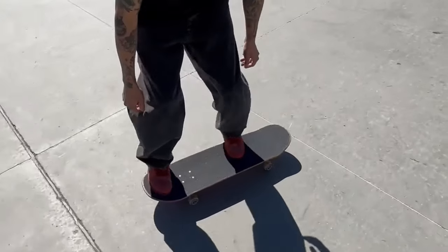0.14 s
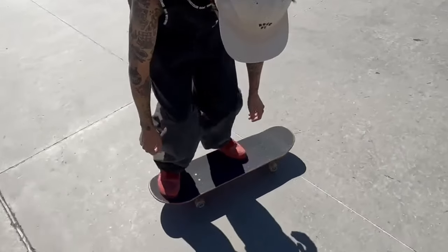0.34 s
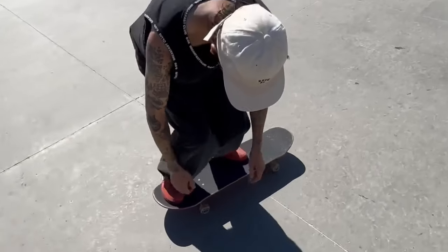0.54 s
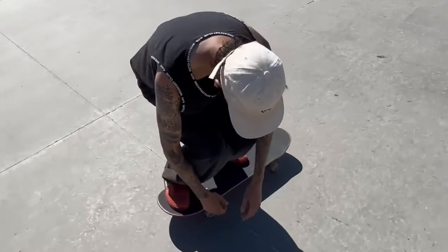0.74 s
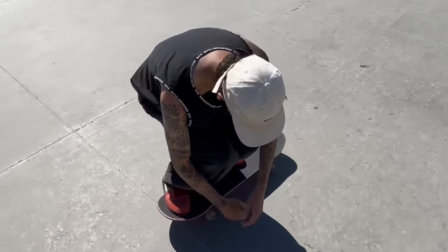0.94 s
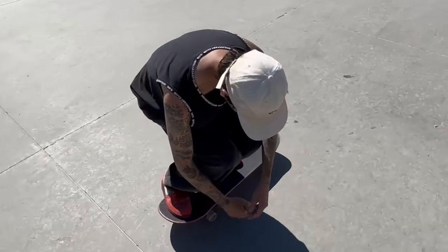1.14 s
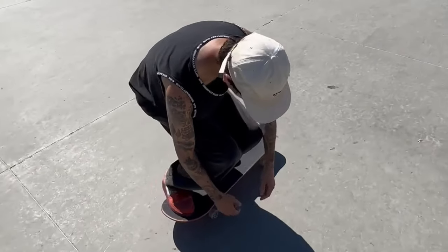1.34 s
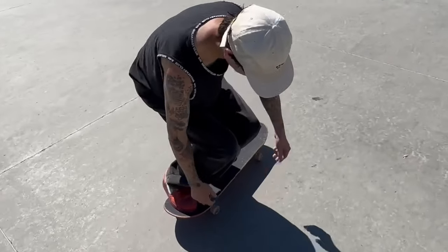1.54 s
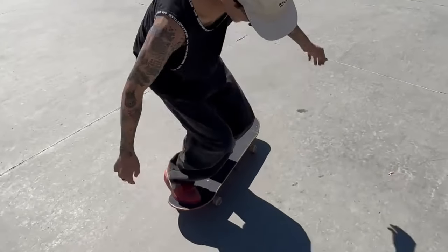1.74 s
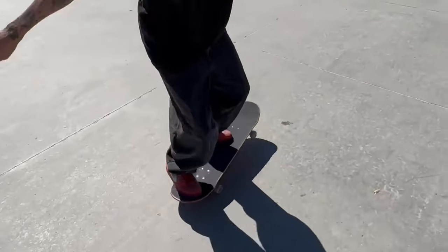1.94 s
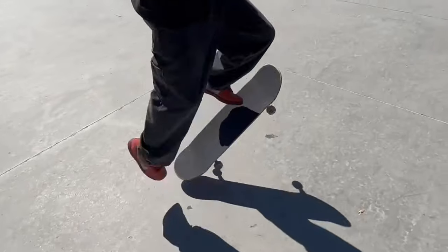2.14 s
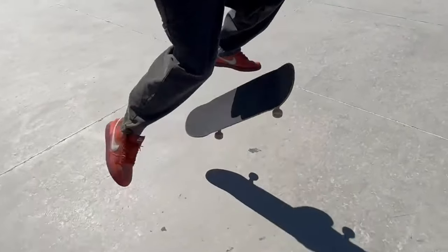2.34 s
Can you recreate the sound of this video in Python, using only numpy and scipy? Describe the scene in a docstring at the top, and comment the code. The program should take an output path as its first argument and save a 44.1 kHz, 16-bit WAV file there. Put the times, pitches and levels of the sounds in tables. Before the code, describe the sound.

Close stereo microphones catch skateboard wheels rumbling on smooth concrete, double knocks at two joints, light shoe scuffs, then a bright woody tail pop, gritty shoe slide and loose truck ticks, with faint open-air scatter.

```python
"""A skateboard knocks over slab joints as it rolls on smooth concrete in an open skatepark, heard close.
Each joint knock rings modes of the weighted deck and its metal trucks, with a burst of gritty noise.
The tail then cracks on the ground: free deck modes ring under a noise crack, and the trucks tick.
Coloured noise makes the wheels' rumble, shoe scuffs on grip tape, the airborne whirr and a puff of wind.
The knocks, tail crack and ticks scatter faintly from the ramps around."""
import sys
import numpy as np
from scipy import signal
from scipy.fft import rfft, irfft
from scipy.io import wavfile
from scipy.ndimage import uniform_filter1d

SR = 44100
rng = np.random.default_rng(int(sys.argv[2]) if len(sys.argv) > 2 else 0)


def log_audio(samples):
    """Write samples as a 16-bit WAV file to the path given in sys.argv[1]."""
    # one column per channel
    frames = np.atleast_2d(samples).T
    # limit to full scale, then quantise
    limited = np.clip(frames, -1, 1)
    pcm = np.round(limited * 32767).astype(np.int16)
    wavfile.write(sys.argv[1], SR, pcm)


N = 105840
T = np.arange(N) / SR
FREQS = np.fft.rfftfreq(2 * N, 1 / SR)

# Ringing of the metal trucks: (frequency at pitch ratio 1 [Hz], relative level [dB], t60 [s])
TRUCK_MODES = [(1740, -6, 0.027), (2505, -8, 0.04), (2675, -3, 0.048), (2900, -5, 0.039),
               (3610, -8.5, 0.059), (4920, 1, 0.014)]
TRUCK_CONTACT_HZ = 6000
# The tail striking the ground: (time [s], relative body level [dB], contact brightness [Hz],
# relative crack level [dB])
TAIL_BLOWS = [(2.0475, 0, 3000, -0.5), (2.0525, -7, 2790, -4), (2.0605, -8.5, 904, -26)]


def undb(db):
    """Turn decibels into gain."""
    return 10 ** (np.asarray(db) / 20)


def over_freq(points):
    """Join (frequency [Hz], value) points on a log-frequency axis."""
    hz, value = np.array(points, float).T
    return np.interp(np.log(FREQS + 1), np.log(hz), value)


def shape(x, gain):
    """Filter by a gain for each frequency, padded to twice the length."""
    return irfft(rfft(x, 2 * N) * gain)[..., :N]


def noise(spectrum, likeness=0):
    """Stereo noise of rms 1 with a given colour; likeness weighs its mid against its side."""
    likeness = np.clip(likeness, -.99, .99)
    colour = undb(over_freq(spectrum))
    mid = shape(rng.standard_normal(N), colour * np.sqrt(1 + likeness))
    side = shape(rng.standard_normal(N), colour * np.sqrt(1 - likeness))
    stereo = np.array([mid + side, mid - side])
    return stereo / stereo.std()


def fader(curve):
    """Gain along (time [s], level [dB]) points, held flat beyond the ends."""
    return undb(np.interp(T, *np.array(curve).T))


def walk(rate):
    """Random steps at the given rate [Hz], smoothed into ramps."""
    step = max(int(SR / rate), 2)
    held = np.repeat(rng.standard_normal(N // step + 1), step)
    return 0.83 * uniform_filter1d(held, step)[:N]


def decay(start, t60, rise):
    """A squared rise, then an exponential fall of 60 dB per t60."""
    age = np.maximum(T - start, 0)
    attack = np.minimum(age / rise, 1) ** 2
    return attack * np.exp(-np.log(1000) * np.maximum(age - rise, 0) / t60)


def swells(rows):
    """A half-sine rise and fall for each (start [s], length [s], peak level [dB]) row."""
    return sum(undb(db) * np.sin(np.pi * np.clip((T - start) / length, 0, 1))
               for start, length, db in rows)


def strike(modes, start, contact_hz, pitch=1):
    """One blow rings a set of decaying modes; a softer contact dulls the high ones."""
    t = T[:SR // 8]
    ring = 0
    for k, (hz, db, t60) in enumerate(modes):
        # neighbouring modes start in opposite directions
        swing = (-1) ** k * np.sin(2 * np.pi * hz * pitch * t)
        ring = ring + undb(db) * swing * np.exp(-np.log(1000) * t / t60)
    contact = signal.butter(2, min(contact_hz, SR / 3), fs=SR, output="sos")
    return np.pad(signal.sosfilt(contact, ring), (int(start * SR), N))[:N]


def at_ports(x):
    """A near sound reaches the two microphones out of step by a phase that varies with frequency."""
    # Phase between the microphones: (frequency [Hz], lead of the left [rad])
    port_phase = [(100, 0.5), (600, 0.4), (900, 1.75), (1300, 0.78), (1900, 1.27), (2900, 1.5), (4400, 4.5)]
    half_each = np.array([[1], [-1]]) / 2
    return shape(x, np.exp(1j * over_freq(port_phase) * half_each))


def wind():
    """A puff of wind on the microphones is low noise that swells and fades."""
    # When the wind puffs: (start [s], length [s], peak level [dB])
    gusts = [(.95, 0.33, -35)]
    # Colour of the wind: (frequency [Hz], relative level [dB])
    wind_colour = [(20, 0.5), (42, -4), (80, -7), (160, -40), (600, -81)]
    return noise(wind_colour) * swells(gusts)


def park(hits):
    """Faint scatter from the ramps around is the hits smeared by a decaying noise tail."""
    scatter_db, t60_s = -22.5, 0.78
    tail = rng.standard_normal((2, N)) * decay(0.017, t60_s, 0.018)
    tail = tail / np.sqrt(np.sum(tail ** 2) / 2)  # mean energy of 1 per channel
    return undb(scatter_db) * shape(hits, rfft(tail, 2 * N))


def shoes_and_bearings():
    """Shoes scuff the grip tape; after the pop a shoe slides up it and the freed wheels whirr."""
    # Shoes on grip tape: (start [s], length [s], peak level before grain [dB])
    scuffs = [(-.02, 0.076, -46.5), (.12, 0.15, -47), (.713, 0.012, -48), (1.569, 0.0083, -44),
              (1.585, .04, -54), (1.732, 0.016, -47), (1.768, 0.016, -54.5), (1.892, 0.021, -33),
              (1.915, 0.044, -58), (2.005, 0.1, -40.5), (2.087, .008, -40), (2.107, .006, -34.5),
              (2.268, .005, -54)]
    # Colour of the scuffs: (frequency [Hz], relative level [dB])
    scuff_colour = [(300, -7.5), (1300, 9), (2200, -1.5), (3200, 1.5), (4300, 3), (5800, -16.5),
                    (7500, -4.5), (10000, -34.5)]
    # Sliding shoe and spinning wheels: (time [s], level before grain [dB])
    spin_level = [(2.06, -44.5), (2.13, -38), (2.19, -47), (2.29, -49), (2.4, -54)]
    # Colour of the slide and spin: (frequency [Hz], relative level [dB])
    spin_colour = [(300, -4), (1000, 16), (1800, 5.5), (2800, -2), (4400, 1), (5800, -21.5), (7500, -4),
                   (10000, -51)]
    grain_db = 4.5  # swing per unit of the random walk
    airborne = T > TAIL_BLOWS[0][0]
    scuffing = noise(scuff_colour) * swells(scuffs)
    spinning = noise(spin_colour) * fader(spin_level) * airborne
    return (scuffing + spinning) * undb(grain_db * walk(220))


def truck_rattles():
    """The unloaded trucks tick against their bolts, each tick ringing the metal."""
    # Ticks of the loose trucks: (time [s], level [dB], pitch ratio)
    rattles = [(2.066, -34.5, 1), (2.127, -37.5, 1), (2.145, -44, 1.1), (2.162, -39, 1), (2.27, -47, 1.5),
               (2.288, -39.5, 0.71), (2.297, -39, .67)]
    ticks = sum(undb(db) * strike(TRUCK_MODES, start, TRUCK_CONTACT_HZ, pitch)
                for start, db, pitch in rattles)
    return at_ports(ticks)


def tail_pop():
    """Bare wood cracks on concrete, rebounds and rings in its free modes."""
    # The deck ringing freely: (frequency [Hz], relative level [dB], t60 [s])
    free_deck = [(477, -11.5, 0.1), (609, -5.5, .075), (760, -4.5, .05), (856, -2, 0.068),
                 (1010, -4, 0.051), (1191, -5, 0.054), (1314, -4.5, 0.062), (1390, -2.5, 0.058),
                 (1750, -11, 0.12), (1770, -10, 0.042), (1890, 0, 0.035), (2020, -6.5, 0.046),
                 (2547, -12.5, 0.06), (2755, -20.5, 0.047), (3000, -19.5, 0.016), (4300, -24.5, .04)]
    # Colour of the crack: (frequency [Hz], relative level [dB])
    crack_colour = [(150, -15), (500, -5), (1000, 1), (1900, 0.5), (2600, -6.5), (4300, -6), (5800, -22),
                    (7600, -18), (8800, -32), (10000, -52)]
    body_db, crack_db = -10, -11
    crack_t60_s, crack_rise_s = .022, 0.0011
    body, crack = 0, 0
    for start, blow_db, contact_hz, blow_crack_db in TAIL_BLOWS:
        body = body + undb(blow_db) * strike(free_deck, start, contact_hz)
        crack = crack + undb(blow_crack_db) * decay(start, crack_t60_s, crack_rise_s)
    return undb(body_db) * at_ports(body) + undb(crack_db) * crack * noise(crack_colour)


def rolling():
    """Wheels rumble on the fine grain of the concrete: dark noise with a quick, small flutter."""
    # Colour of the rumble: (frequency [Hz], relative level [dB])
    roll_colour = [(15, -14.5), (25, -11), (103, -3), (174, -3), (224, -5), (359, -7.5), (427, -5),
                   (484, -8), (621, -3.5), (721, -11), (948, -10), (1520, -26.5), (2760, -39),
                   (5020, -46.5), (5830, -66), (7670, -49), (9600, -82), (12500, -119), (21100, -120)]
    # Left-right likeness of the rumble: (frequency [Hz], likeness [0-1])
    roll_likeness = [(40, 0), (120, .55), (250, 0.92), (520, 0.15), (1000, 0.078), (2200, 0.025)]
    # Loudness of the rumble: (time [s], level before grain [dB])
    roll_level = [(0, -34), (.5, -32), (1.1, -33), (1.6, -32), (2.0, -32), (2.2, -33.5), (2.4, -33)]
    grain_db = 1.5  # swing per unit of the random walk
    rumble = noise(roll_colour, over_freq(roll_likeness))
    return rumble * fader(roll_level) * undb(grain_db * walk(70))


def joint_knocks():
    """Each blow thumps, bends and rings the weighted deck, with a gritty crunch and ringing trucks."""
    # Wheels hitting joints and feet loading the deck: (time [s], relative body level [dB],
    # contact brightness of the body [Hz], pitch ratio of the body, relative flex level [dB],
    # relative hollow-ring level [dB], relative level of grit and trucks [dB])
    knocks = [(.212, -26, 198, 0.82, -9.5, -35, -28.5), (0.2319, 0, 1000, .93, -17, -13.5, 1),
              (0.2424, -16, 690, 1.0, -21, -20.5, -14), (.2555, -0.5, 420, 0.96, -8, -11, -9),
              (0.2693, -20, 890, 1.2, -32, -19, -8.5), (.277, -21.5, 354, .95, -18, -21, -18.5),
              (.7315, -1.5, 840, 1.04, -12, -11.5, -4.5), (.7455, -6, 664, 1.06, -10, -9.5, -10),
              (.7625, -3.5, 414.6, 1.16, -12.5, -18.5, -18.5), (.7750, -12, 860, 1.06, -21.5, -9.5, -16.5),
              (.784, -20, 890, 1.05, -36, -16.5, -15.5), (0.801, -30.5, 180, 0.77, -15, -23, -25),
              (1.576, -15, 713, 0.92, -32, -18.5, -20.5), (1.6005, -8.5, 219, .88, -23.5, -34, -29),
              (1.860, -15.5, 160, .8, -20, -39, -25.5), (1.970, -25, 300, 0.82, -31, -29.5, -25),
              (2.075, -17, 222, .9, -22.5, -36, -29), (2.097, -25, 200, .9, -16.5, -34, -19),
              (2.108, -20.5, 1500, 1.0, -36, -29.5, -31), (2.117, -34, 198, 0.71, -16.5, -38, -24)]
    # Body of the deck under the rider: (frequency at pitch ratio 1 [Hz], relative level [dB], t60 [s])
    loaded_deck = [(208.4, -5.5, 0.053), (262, -2.5, 0.05), (317.6, -2.5, 0.059), (437, -9, 0.048),
                   (614, -12, 0.019), (824, -7, 0.022), (896, -4, 0.041), (1280, -20, 0.07)]
    # Slow bending of the deck: (frequency [Hz], relative level [dB], t60 [s])
    deck_flex = [(86, -12.5, 0.078), (130.5, -1, 0.074)]
    # Hollow ring of the deck: (frequency [Hz], relative level [dB], t60 [s])
    deck_ring = [(565.4, -2, 0.056), (627.4, 0, 0.059)]
    # Colour of the grit: (frequency [Hz], relative level [dB])
    grit_colour = [(100, 4), (400, 3), (850, 5.5), (1200, -7), (1900, -22.5), (2800, -18), (4900, -20.5),
                   (5900, -31.5), (7500, -23), (8800, -40), (10000, -36)]
    wood_db, truck_db, crunch_db = -1.5, -32.5, -16
    grit_t60_s, grit_rise_s = 0.064, .004
    body, grit = 0, 0
    for start, body_db, contact_hz, pitch, flex_db, ring_db, grit_db in knocks:
        thump = undb(body_db) * strike(loaded_deck, start, contact_hz, pitch)
        bend = undb(flex_db) * strike(deck_flex, start, 200)
        hollow = undb(ring_db) * strike(deck_ring, start, 1100)
        # the metal answers halfway up the rise of the grit
        metal = strike(TRUCK_MODES, start + grit_rise_s / 2, TRUCK_CONTACT_HZ)
        body = body + undb(wood_db) * (thump + bend + hollow) + undb(truck_db + grit_db) * metal
        grit = grit + undb(grit_db) * decay(start, grit_t60_s, grit_rise_s)
    # the board radiates little of its lowest motion
    radiation = signal.butter(2, 70, "high", fs=SR, output="sos")
    radiated = signal.sosfilt(radiation, body)
    return at_ports(radiated) + undb(crunch_db) * grit * noise(grit_colour)


def scene():
    """Mix the board, the open park and a puff of wind."""
    hits = joint_knocks() + tail_pop() + truck_rattles()
    return hits + park(hits) + rolling() + shoes_and_bearings() + wind()


def record(dry):
    """Each microphone has its own colour; the peaks are capped, then the top is cut."""
    # Balance of the two microphones: (frequency [Hz], left minus right [dB])
    port_balance = [(60, -3), (200, -0.6), (380, -0.5), (600, 2.5), (900, 4.5), (1300, 1.5), (1900, -2.5),
                    (2900, 13.5), (4400, -9), (7000, 1)]
    top_hz = 9400
    half_each = np.array([[.5], [-.5]])
    coloured = shape(dry, undb(over_freq(port_balance) * half_each))
    capped = np.clip(coloured, -1, 1)
    top_cut = signal.ellip(8, .2, 70, top_hz, fs=SR, output="sos")
    return signal.sosfilt(top_cut, capped)


dry = scene()
out = record(dry)
log_audio(out)
```